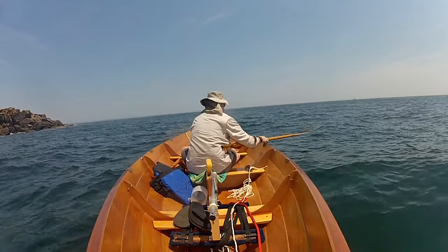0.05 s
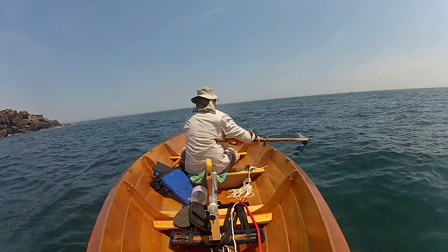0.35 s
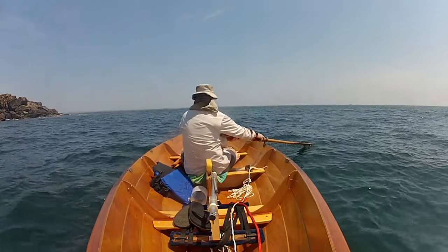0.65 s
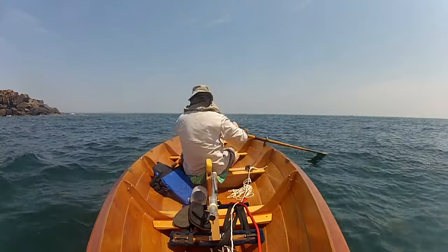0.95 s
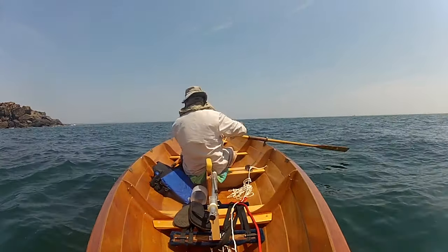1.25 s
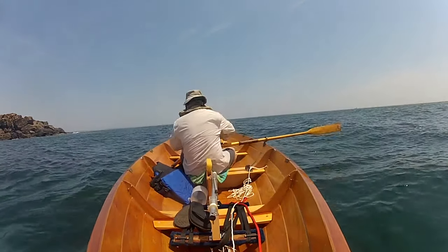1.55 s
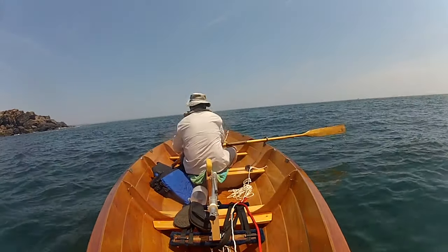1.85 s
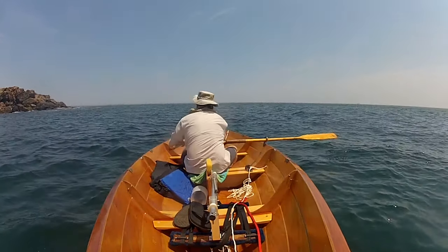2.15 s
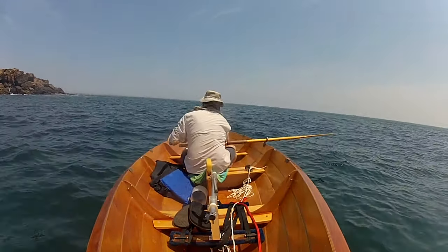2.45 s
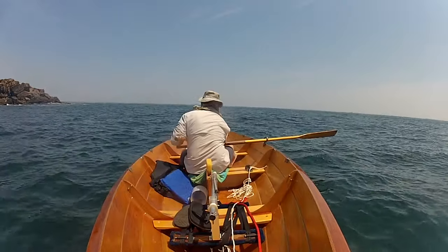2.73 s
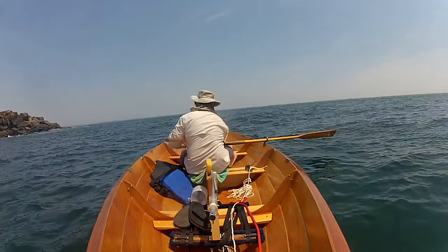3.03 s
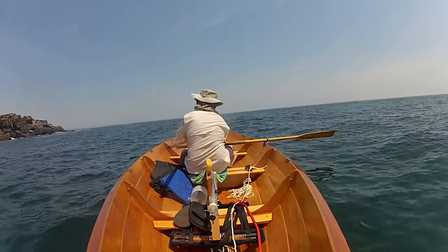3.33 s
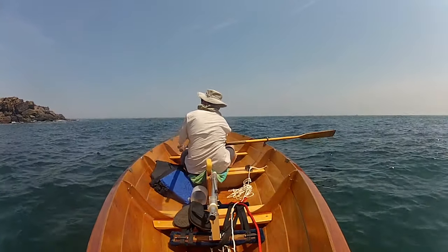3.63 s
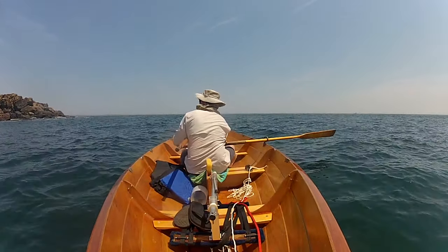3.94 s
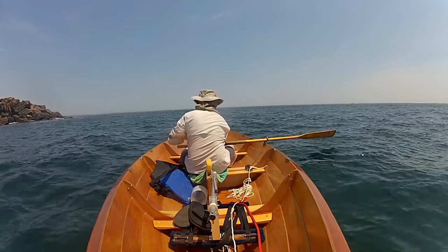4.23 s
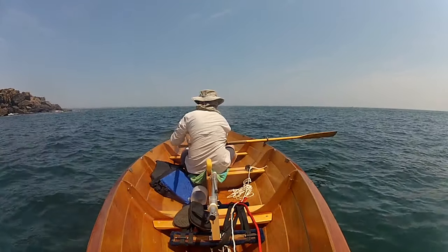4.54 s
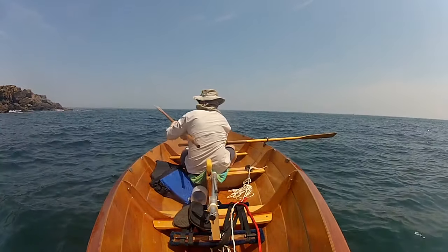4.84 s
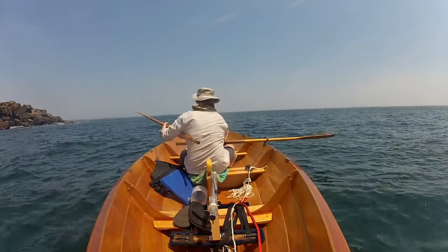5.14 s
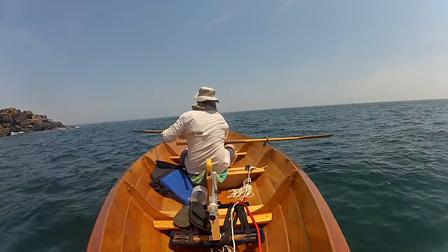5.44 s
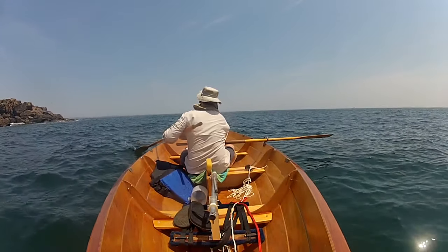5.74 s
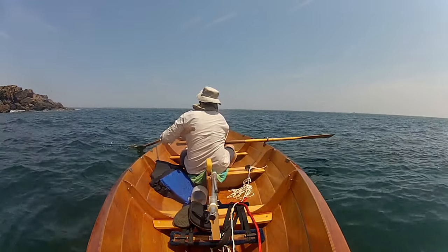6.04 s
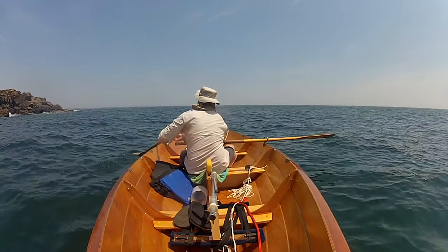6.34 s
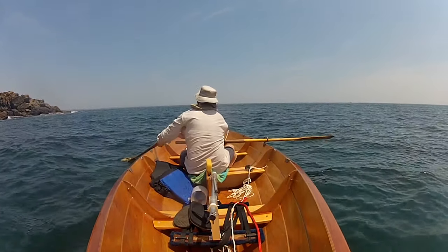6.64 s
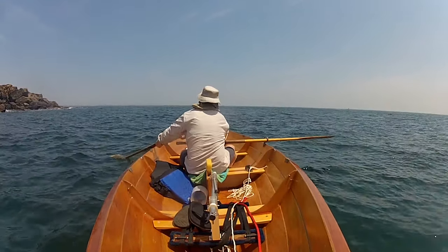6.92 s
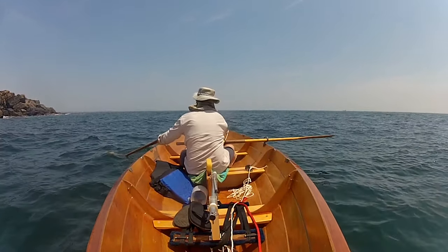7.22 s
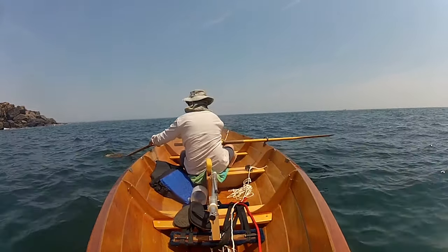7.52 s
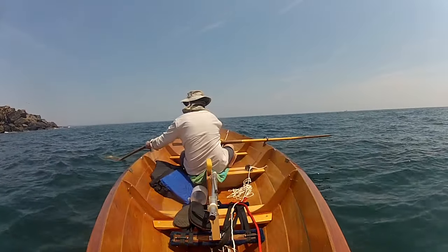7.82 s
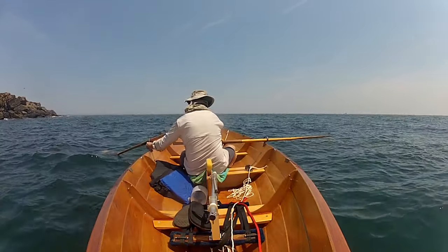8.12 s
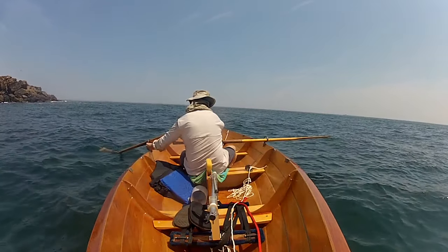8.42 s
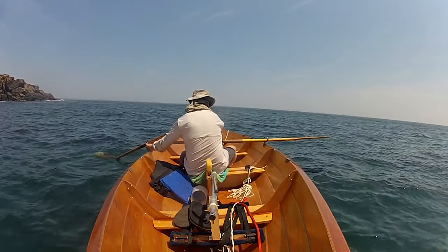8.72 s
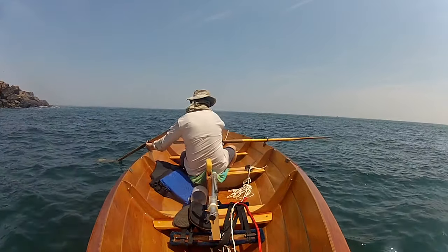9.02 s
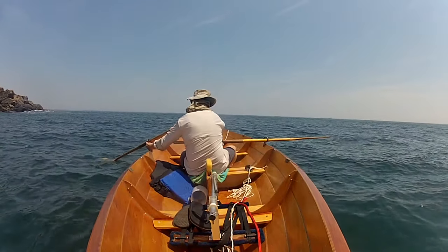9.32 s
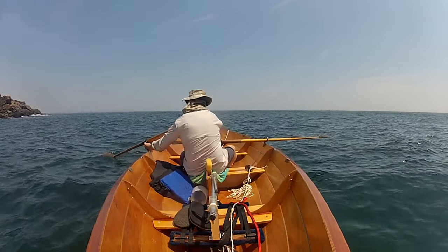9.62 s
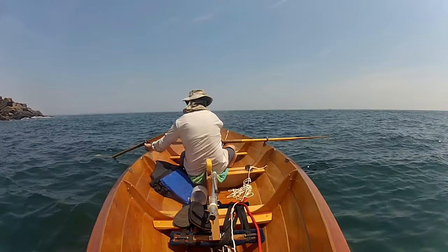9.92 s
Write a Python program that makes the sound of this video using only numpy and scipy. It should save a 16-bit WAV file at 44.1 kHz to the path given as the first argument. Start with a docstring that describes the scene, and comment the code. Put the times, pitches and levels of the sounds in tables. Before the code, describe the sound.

A wooden boat is rowed through light chop, heard from a microphone at the stern. At first the oars knock and rattle busily in their locks while waves thump the planks and the hull rumbles deeply. A quieter stretch of lapping and small plops follows. Then an oar clunks, a heavy wave booms against the hull, and the rowing goes on with grinding, gurgles and scattered knocks over a faint wash of open water.

```python
"""A low hull rumble and the knock of oars: a wooden boat is rowed through a light chop.
The microphone is in a small sealed camera fixed at the stern. Oars strike and grind in their locks,
ringing the woodwork and the case; waves thump the planks and each swell sets the hull rumbling.
Close alongside, trapped air slaps, plops and gurgles over an even wash of open water.
The camera's coarse converter adds a glassy top."""
import sys
import numpy as np
from scipy import signal
from scipy.fft import rfft, irfft, next_fast_len
from scipy.io import wavfile
from scipy.ndimage import uniform_filter1d

SR = 44100
rng = np.random.default_rng(int(sys.argv[2]) if len(sys.argv) > 2 else 0)


def wav_out(sig):
    """Save sig, one row per channel (or a flat mono array), as 16-bit PCM at SR to the path in sys.argv[1]."""
    wavfile.write(sys.argv[1], SR, np.round(np.clip(np.atleast_2d(sig).T, -1, 1) * 32767).astype(np.int16))


N = 439677
TIME = np.arange(N) / SR
RING = TIME[:SR // 2]  # time axis of one short event
CALM_SWAY_DB, CALM_DRONE_DB = -48, -53  # wind and small waves between the swells


def knocks(lead_s=.008, bounce_db=-15, bounce_s=.023):
    """Oars and planks strike and chatter: soft blows ring the middle modes, hard ones lows and treble too."""
    # blows of wood on wood: start_s, level_db, hardness_db, rattle_decay_s
    blows = [(.187, -14.5, -26, 0.0095), (.199, -8, -14, 0.0094), (.659, -25, -19, 0.013),
             (0.804, -41, 5.5, 0.0024), (.963, -32, -16, 0.0036), (.973, -25, -4.5, 0.0075),
             (.99, -31, -9, .004), (1.039, -14.5, -11.5, 0.0062), (1.086, -27, -14, 0.0029),
             (1.156, -22, -11, 0.012), (1.202, -21, -10.5, 0.0036), (1.381, -13.5, -18, 0.0081),
             (1.448, -43.5, -4, .004), (1.473, -42, -2, 0.003), (1.529, -20.5, -16.5, 0.0032),
             (1.563, -17.5, -3.5, 0.0065), (1.747, -16.5, -21, 0.0057), (1.772, -22, -20, 0.0057),
             (1.808, -24, -17.5, 0.009), (2.022, -33, -3, 0.0056), (2.037, -34, 1, 0.0062),
             (2.263, -19, -16, 0.015), (2.289, -25.5, -17, 0.004), (2.341, -18.5, -15, 0.005),
             (2.893, -28.5, -12.5, 0.014), (3.378, -37, -7.5, 0.0036), (3.9, -23.5, -20.5, 0.0069),
             (4.0, -22.5, -12.5, 0.0032), (6.174, -36.5, -8, 0.0052), (6.279, -14, -20.5, 0.006),
             (6.318, -36, 4, .002), (6.338, -29.5, -13, 0.0073), (6.409, -36, -9.5, 0.0056),
             (7.62, -52, 3, 0.0035), (7.832, -14.5, -9.5, 0.0094), (7.973, -42.5, 2.5, 0.0061),
             (8.403, -25, -17, 0.013), (8.724, -20.5, -22, 0.0058), (9.416, -19, -15, 0.0033),
             (9.962, -15, -22, 0.0048)]
    out = np.zeros(N)
    load_db = 20 * np.log10(np.hypot(swell()[0] / undb(CALM_SWAY_DB), 1))
    for s, level_db, hard_db, rattle_s in blows:
        # the shaft flexes as it lands, so the contacts build for a moment before they die
        chatter = rng.choice([-1, 1], len(RING)) * ticks(1800, len(RING))
        force = chatter * attack(.0012) * np.exp(-RING / max(rattle_s, .002))
        bounces = rng.standard_normal(len(RING)) * ticks(300, len(RING))  # the loose shaft rattles on
        force += bounces * undb(bounce_db) * np.exp(-RING / bounce_s)
        force[0] = 1  # first contact
        hit = wood(force, scatter_db=2, crack_db=2, crack_t60=.06, detune=.009)
        hit = np.pad(hit, (int(lead_s * SR), 0))  # silence ahead, so that every band starts smoothly
        hit = band(hit, 4440, "low")  # wood on wood is too soft for the highest treble
        low = band(band(hit, 410, "low"), 880, "low")
        bright = band(hit, 1506, "high")
        middle = hit - low - bright
        # a blow reaches deeper when it is hard and when a swell loads the hull
        low_db = -20.5 + .51 * hard_db + .37 * np.interp(s, TIME, load_db)
        for part, db in ((low, low_db), (middle, -13.5), (bright, hard_db - 5)):
            add(out, s - lead_s - .0012, part * undb(level_db + db) / envelope(part, .02).max())
    return out


def wood(force, scatter_db=0, crack_db=0, crack_t60=.05, detune=0):
    """Contacts ring the woodwork and the camera case: modes of alternating sign and a dense crack."""
    # modes of woodwork and case: pitch_hz, level_db, t60_s
    modes = [(195, -21.5, 0.23), (253.6, -26, 0.19), (278, -23, 0.16), (408, -25, 0.28), (502.7, -21, 0.2),
             (641.6, -14.5, 0.17), (685, -20, 0.16), (779.6, -15, 0.15), (884, -11, 0.08), (939.6, 0, 0.08),
             (1068.7, 4.5, 0.075), (1136.4, -2, 0.097), (1309, -6, 0.063), (1524, -8.5, 0.024),
             (1635, -4.5, 0.039), (2082, -12, 0.043), (2259, -8, 0.033), (2510, -8.5, 0.027),
             (3630, -15.5, 0.019)]
    # spectrum of the dense, short-lived modes: frequency_hz, level_db
    crack_spectrum = [(130, -2), (400, -22.5), (900, 12.5), (1300, 2.5), (1650, -8.5), (1900, -14.5),
                      (2500, -15.5), (3150, -36.5), (3700, -39), (4400, -43.5), (5200, -24), (5900, -30)]
    tones = ring(modes[::2], scatter_db, detune) - ring(modes[1::2], scatter_db, detune)
    crack = noise(crack_spectrum, len(RING)) * undb(crack_db - 60 * RING / crack_t60)
    return signal.fftconvolve(force, tones + crack)[:len(force)]


def oar_drop(start_s=7.831, level_db=-28.5):
    """An oar drops hard into its lock with a dry snap and rings it."""
    out = np.zeros(N)
    snap = noise([(3000, -14), (4300, -1), (5900, -6)], len(RING)) * undb(-12.5 - 60 * RING / .059)
    tones = ring([(779, 11.2, .13), (1550, 3.3, .06)]) * attack(.0023)
    add(out, start_s, undb(level_db) * (snap + tones))
    return out


def oar_catch(start_s=6.278, level_db=-14):
    """As the oar catches the water, the shaft strikes its lock once and leaves it ringing."""
    # modes of the free oarlock: pitch_hz, level_db, t60_s
    lock_modes = [(620, -10.5, 0.15), (1066, 0, 0.15), (1593, -2, 0.038)]
    out = np.zeros(N)
    add(out, start_s, undb(level_db) * ring(lock_modes) * attack(.0016))
    return out


def grinding(slips_per_s=1300):
    """Dense uneven slips of the shaft in its lock ring the wood; the colour shifts as the shaft turns."""
    # turns of the shaft: full_pressure_s, hold_s, level_db
    turns = [(.68, 0.037, -39), (.97, 0.11, -44), (1.42, 0.37, -50.5), (1.9, 0.055, -48.5),
             (2.31, 0.052, -49), (6.565, 0.25, -37), (8.29, 0.38, -47.5), (8.66, 0.11, -42),
             (8.85, 0.041, -50), (9.05, 0.13, -45), (9.39, 0.013, -35.5)]
    slips = ticks(slips_per_s) * rng.standard_normal(N)
    slips *= undb(2.54 * rng.exponential(size=N) + 2.1 * walk(32))
    rub = wood(slips)
    # bands that waver separately: edges_hz, level_db
    zones = [([620, 930], -7), ([950, 1220], 1), ([1230, 2000], -7.5),
             ([2000, 2800], -16), ([3300, 4000], -28)]
    rub = sum(unit(band(rub, edges, "band")) * undb(db + 2 * walk(4.8)) for edges, db in zones)
    pressure = surges(turns, rise=233.5, fall=298, sag=27.5)
    return rub / envelope(rub, .13) * pressure


def thumps(clatter_db=-16, clatter_t60=.41, cushion_db_per_s=1498):
    """A wave is a soft push on the hull: a long one booms deeper, a short one shakes the loose boards."""
    # heavy waves against the planks: start_s, level_db, push_s
    waves = [(0.208, -20.5, 0.0062), (.735, -26, 0.0067), (1.055, -27, 0.0064), (1.386, -17, 0.0017),
             (1.48, -11, 0.015), (2.268, -20.5, 0.0015), (5.18, -29, 0.0064), (6.291, -10.5, 0.0035),
             (6.389, -23.5, 0.0074), (6.779, -4.5, 0.016)]
    # hull modes: pitch_hz, level_db, t60_s
    hull_modes = [(57.2, 3, 0.29), (79.4, -21, 0.23), (116, -25.5, 0.068), (139.9, 7.5, 0.44)]
    # spectrum of the loose boards: frequency_hz, level_db
    board_spectrum = [(180, -5), (280, 1.5), (400, -3.5), (650, 3.5), (1100, -8.5), (1700, -13.5),
                      (2600, -25.5), (4000, -44.5)]
    out = np.zeros(N)
    for s, db, push_s in waves:
        push = np.sin(np.pi * np.minimum(RING / push_s, 1))
        boom = signal.fftconvolve(push, ring(hull_modes))[:len(RING)]
        clatter = noise(board_spectrum, len(RING)) * attack(.0092)
        clatter *= undb(3.8 * walk(90)[:len(RING)] - 60 * RING / clatter_t60)
        clatter *= undb(clatter_db - cushion_db_per_s * push_s)
        add(out, s, undb(db) * (boom / np.abs(boom).max() + clatter))
    return out


def rumble():
    """The hull sways and its planks drone with each swell; wind keeps both going in between."""
    # spectrum of the hull's deep sway: frequency_hz, level_db
    sway_spectrum = [(28, -32), (40, -19), (50, 1), (58, 14.5), (68, -3.5), (79, 2.5), (95, -19),
                     (125, -53)]
    # spectrum of the droning planks: frequency_hz, level_db
    drone_spectrum = [(80, -17.5), (103, 0.5), (118, -10), (128, -1.5), (140, 1.5), (160, -13),
                      (200, -25.5), (300, -33.5), (450, -39)]
    swaying, droning = swell()
    sway, drone = noise(sway_spectrum), noise(drone_spectrum)
    gusts_db = 1.6 * walk(7.4)
    sway_gain = np.hypot(swaying, undb(CALM_SWAY_DB + gusts_db))
    drone_gain = np.hypot(droning, undb(CALM_DRONE_DB + gusts_db / 2))
    return sway / envelope(sway, .13) * sway_gain + drone / envelope(drone, .18) * drone_gain


def swell():
    """How strongly the swells stir the hull's deep sway and its planks; the planks settle first."""
    # swells that lift and shake the boat: crest_s, hold_s, sway_db, drone_db
    swells = [(0, 0.009, -23.5, -35.5), (0.249, 0.057, -29.5, -27.5), (0.73, 0.02, -18, -27.5),
              (1.045, 0.19, -20.5, -30), (1.434, 0.18, -23, -28), (1.772, 0.18, -28.5, -37.5),
              (2.157, .01, -32, -34), (2.3, 0.036, -22.5, -26), (2.448, 0.066, -26, -40.5),
              (2.934, 0.06, -41, -40.5), (3.92, 0.021, -25.5, -47), (4.072, 0.015, -33.5, -32),
              (5.292, 0.023, -36, -51), (6.353, 0.045, -21, -23.5), (6.473, 0.11, -26.5, -37),
              (6.798, 0.027, -19, -36.5), (6.982, 0.053, -25.5, -62), (7.868, 0.023, -42, -39.5),
              (8.037, 0.4, -42.5, -48), (8.77, 0.039, -39, -51), (9.445, 0.54, -42.5, -56)]
    s, hold_s, sway_db, drone_db = np.transpose(swells)
    return (surges(zip(s, hold_s, sway_db), rise=187, fall=71),
            surges(zip(s, hold_s, drone_db), rise=187, fall=112.5))


def slaps(pocket_t60=.013, slosh_t60=.1):
    """Water claps shut on a pocket of air, whose few cycles slosh on between water and hull."""
    # air pockets under the planks: start_s, pitch_hz, level_db, relative_slosh_db
    pockets = [(.714, 1006, -31.5, 4), (2.116, 1085, -41.5, 2), (6.856, 943, -33, 5),
               (8.067, 957, -35.5, 7), (8.138, 1043, -23.5, -2.5), (9.869, 930, -30.5, 10)]
    out = np.zeros(N)
    for s, hz, db, slosh_db in pockets:
        pocket = bubble(hz, pocket_t60) * attack(.0014) ** 2
        echoes = rng.standard_normal(len(RING)) * undb(-60 * RING / slosh_t60)
        slosh = signal.fftconvolve(pocket, echoes / np.linalg.norm(echoes))[:len(RING)]
        slap = pocket + slosh * undb(slosh_db)
        add(out, s, slap * undb(db) / envelope(np.pad(slap, len(RING)), .02).max())
    return out + spray(out, relative_db=-26)


def plops():
    """Single bubbles ring out, each with a wet splash."""
    # bubbles and drips beside the hull: start_s, pitch_hz, level_db, t60_s
    drips = [(0.723, 900, -24, 0.045), (2.517, 2220, -37.5, 0.03), (2.895, 621, -32, 0.093),
             (2.975, 1700, -47, .09), (4.69, 641, -42.5, 0.26), (5.825, 517, -46, 0.46),
             (3.047, 3670, -50, 0.026), (5.638, 3700, -49.5, 0.046), (6.895, 2055, -37, 0.048),
             (8.442, 3620, -39.5, 0.034), (8.573, 2470, -26.5, 0.035), (8.993, 2305, -38.5, 0.043),
             (9.079, 2254, -28.5, 0.059), (9.105, 1645, -30, 0.053)]
    out = np.zeros(N)
    for s, hz, db, t60 in drips:
        splash = noise([(hz / 2, -26), (hz, 0), (hz * 2, -38)], len(RING)) * undb(-8 - 60 * RING / t60)
        add(out, s, (bubble(hz, t60) + splash) * attack(.0016) * undb(db))
    return out


def gurgles(count=48, bubbles_per_s=150, ring_cycles=61, spread_oct=.173):
    """The eddy behind the blade sheds a string of bubbles, each with its own pitch and strength."""
    # the blade draws through the water and swallows air: start_s, length_s, centre_hz, level_db
    pulls = [(6.56, .2, 1060, -47), (8.272, 0.14, 832, -48.5), (8.406, .11, 920, -43),
             (8.611, .09, 920, -42), (8.661, .045, 947, -39.5), (9.019, .1, 934, -46),
             (9.351, 0.087, 853, -40)]
    out = np.zeros(N)
    for s, length_s, hz, db in pulls:
        string = np.zeros(N)
        for k, (late, offset, strength) in enumerate(rng.standard_normal((count, 3))):
            delay = (k + .397 * late) / bubbles_per_s
            if delay < length_s:
                pitch = hz * 2 ** (spread_oct * offset)
                add(string, delay, bubble(pitch, ring_cycles / pitch) * undb(3.9 * strength))
        string = string[:len(RING)]
        add(out, s, string * undb(db) / envelope(string, .04).max())
    return out + spray(out, relative_db=-11.5)


def laps(far_count=20, far_hz=1150, far_db=-60):
    """Near wavelets lap at the planks; farther off, fainter ones of all sizes come at random."""
    # the nearest wavelets: start_s, centre_hz, level_db, spread_s
    near_laps = [(1.9, 930, -45, 0.015), (3.008, 1056, -43.5, 0.0071), (4.112, 1250, -51.5, 0.0094),
                 (4.245, 980, -52, 0.018), (4.466, 1810, -54, 0.0046), (4.69, 845, -48, .008),
                 (4.905, 1030, -48.5, 0.0085), (5.195, 2280, -54.5, 0.0074), (5.53, 1205, -48.5, 0.0052),
                 (5.572, 1030, -48.5, 0.0038), (5.843, 900, -50.5, .009), (9.163, 1470, -43, 0.004),
                 (9.376, 400, -46, .014), (9.567, 950, -52, .008), (9.715, 1100, -53, .009),
                 (9.942, 1090, -41.5, .006)]
    out = np.zeros(N)
    for s, hz, db, spread_s in near_laps:
        add(out, s, wavelet(hz, spread_s) * undb(db))
    for when, octave in rng.random((far_count, 2)):
        add(out, when * N / SR, wavelet(far_hz * 2 ** (octave - .5)) * undb(far_db))
    return out + spray(out, relative_db=-16)


def wavelet(hz, spread_s=.0055, count=22):
    """A wavelet folds over and traps a small cloud of short-lived bubbles."""
    cloud = np.zeros(N)
    for delay, offset in zip(spread_s * rng.gamma(1.5, 1, count), rng.standard_normal(count)):
        pitch = hz * 2 ** (.23 * offset)
        add(cloud, delay, bubble(pitch, 20 / pitch) * attack(.00077) * undb(-2 * offset ** 2))
    cloud = cloud[:len(RING)]
    return cloud / envelope(cloud, .02).max()


def bubble(hz, t60):
    """A bubble rings and rises a little in pitch as it nears the surface."""
    phase = 2 * np.pi * hz * (RING + .017 * np.minimum(RING / t60, 1) * RING)
    return np.sin(phase) * attack(.00017) * undb(-60 * RING / t60)


def spray(water, relative_db, drops_per_s=450):
    """Droplets patter on the planks as strongly as the water moves."""
    patter = wood(ticks(drops_per_s) * rng.standard_normal(N))
    return unit(band(patter, [2500, 4100], "band")) * envelope(water, .015) * undb(relative_db)


def sea(wash_db=-58.5, fizz_db=-65.5):
    """An even wash of open water, and ripples fizzing faintly on the planks."""
    # spectrum of the open water: frequency_hz, level_db
    wash_spectrum = [(170, 0), (370, -8.5), (410, -3), (450, -10.5), (600, -13.5), (1090, -16.5),
                     (1270, -27.5), (1500, -27.5), (1750, -14.5), (2350, -15), (2800, -22.5), (3600, -23.5),
                     (4300, -29.5), (5900, -31)]
    wash = noise(wash_spectrum) * undb(wash_db + .78 * walk(5.4))
    ripples = ticks(400) * rng.standard_normal(N) * undb(2.4 * walk(9))
    fizz = wood(ripples, crack_db=4, crack_t60=.06)
    return wash + unit(fizz) * undb(fizz_db)


def undb(db):
    """Decibels to gain."""
    return 10 ** (np.asarray(db) / 20)


def unit(x):
    """Scale to unit rms."""
    return x / np.sqrt(np.mean(x ** 2))


def envelope(x, seconds):
    """Running rms."""
    return np.sqrt(np.abs(uniform_filter1d(x ** 2, max(int(seconds * SR), 1))) + 1e-18)


def attack(seconds):
    """Soft onset with this time constant."""
    return 1 - np.exp(-RING / seconds)


def ticks(per_s, size=N):
    """Impulses at random moments."""
    return rng.random(size) < per_s / SR


def add(out, s, x):
    """Mix x in at time s."""
    i = max(int(s * SR), 0)
    out[i:i + len(x)] += x[:max(N - i, 0)]


def band(x, edges_hz, kind):
    """Gentle filter without delay, so that neighbouring bands join up again."""
    return signal.sosfiltfilt(signal.butter(2, edges_hz, kind, fs=SR, output="sos"), x, padtype=None)


def noise(points, size=N):
    """Noise of unit rms with a spectrum of (Hz, dB) points, cut off outside them."""
    hz, db = np.transpose(points)
    fast = next_fast_len(size, True)
    bins_hz = np.maximum(np.arange(fast // 2 + 1) * SR / fast, 1)
    gain = undb(np.interp(np.log(bins_hz), np.log(hz), db, left=-100, right=-100))
    return unit(irfft(rfft(rng.standard_normal(fast)) * gain, fast)[:size])


def walk(rate):
    """Random levels held 1 / rate s and slewed; spread near 1."""
    hold = int(SR / rate)
    steps = np.repeat(rng.standard_normal(N // hold + 1), hold)
    return unit(uniform_filter1d(steps, hold)[:N])


def surges(events, rise, fall, sag=0):
    """Gain of (time_s, hold_s, level_db) events that rise, sag while held and fall, in dB per second."""
    t = TIME[::64]
    power = 0
    for s, hold, db in events:
        held_db = db - rise * np.maximum(s - t, 0) - sag * np.clip(t - s, 0, hold)
        power += undb(held_db - fall * np.maximum(t - s - hold, 0)) ** 2
    return np.interp(TIME, t, np.sqrt(power))


def ring(modes, scatter_db=0, detune=0):
    """Decaying modes; scatter weights them anew, as when a blow lands on another spot."""
    spot = rng.standard_normal((len(modes), 2))
    return sum(undb(db + scatter_db * weight - 60 * RING / t60)
               * np.sin(2 * np.pi * hz * (1 + detune * shift) * RING)
               for (weight, shift), (hz, db, t60) in zip(spot, modes))


def scene():
    """Oars, hull and water at one microphone on the stern."""
    oars = knocks() + oar_drop() + oar_catch() + grinding()
    hull = thumps() + rumble()
    water = slaps() + plops() + laps() + gurgles() + sea()
    return (oars + hull + water)[None]


def record(dry):
    """The camera drops the deepest bass, samples slowly and holds each value, adding a glassy top."""
    hold_hz, top_hz = 12000, 15000
    slow = signal.resample_poly(dry, hold_hz, SR, axis=1)
    slow = signal.sosfilt(signal.butter(4, [36, 5800], "band", fs=hold_hz, output="sos"), slow)
    # holding mirrors the sound around the holding rate
    held = signal.resample_poly(np.repeat(slow, 8, axis=1), SR, 8 * hold_hz, axis=1)[:, :N]
    return signal.sosfilt(signal.ellip(8, .2, 70, top_hz, fs=SR, output="sos"), held)


dry = scene()
out = record(dry)
wav_out(out)
```